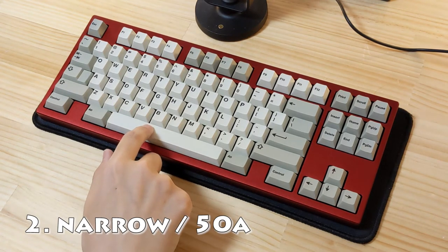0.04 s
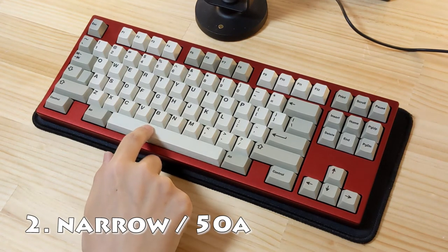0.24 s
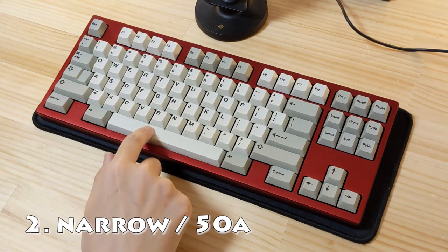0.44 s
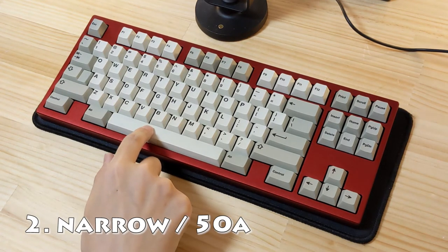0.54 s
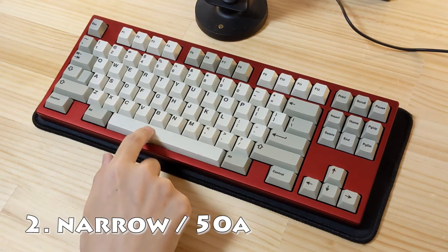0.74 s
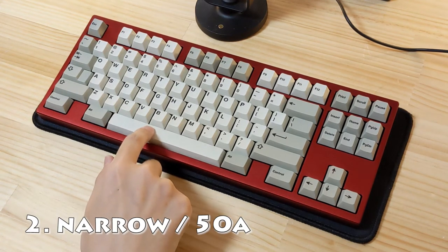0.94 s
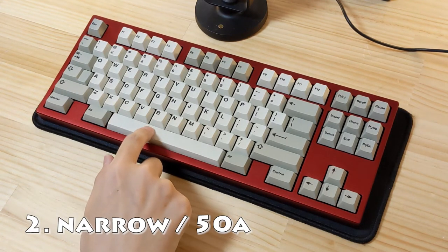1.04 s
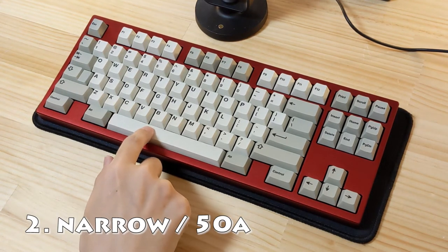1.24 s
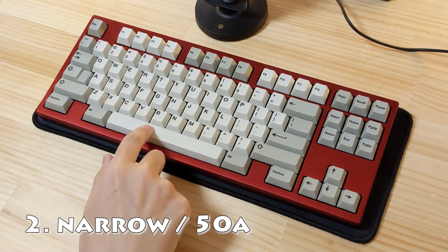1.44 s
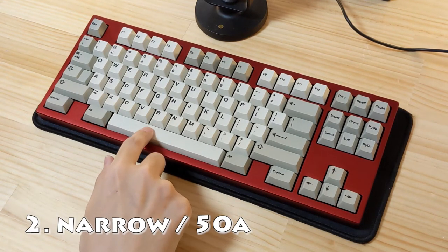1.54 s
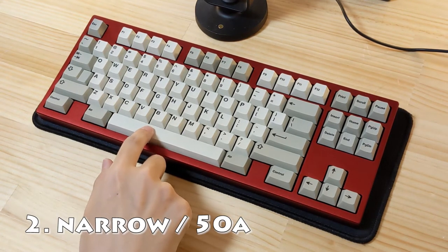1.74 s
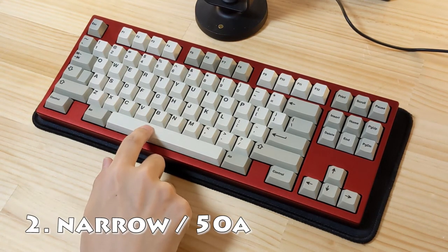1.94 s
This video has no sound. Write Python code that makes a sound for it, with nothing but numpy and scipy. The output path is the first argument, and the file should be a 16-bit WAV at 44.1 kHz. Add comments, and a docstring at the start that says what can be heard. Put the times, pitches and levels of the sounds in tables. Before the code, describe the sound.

Sharp plastic clacks come from a finger repeatedly striking a mechanical keyboard's spacebar, about seven a second, easing off near the end. Faint release ticks and a slight desk boom sit underneath, heard close up in a quiet room.

```python
"""Spacebar taps on a wooden desk

A finger taps the spacebar of a mechanical keyboard eleven times in a quiet room. Each stroke rubs down,
bottoms out with a short plastic clack and a hollow case knock, and sets the desk booming faintly.
Some strokes come back up with a soft knock and a tiny wire rattle; now and then the finger pats the cap.
Every knock is a blow on damped modes, and the same short room answers them all."""
import sys
import numpy as np
from scipy import signal
from scipy.fft import rfft, irfft
from scipy.io import wavfile
from scipy.ndimage import uniform_filter1d

SR = 44100
rng = np.random.default_rng(int(sys.argv[2]) if len(sys.argv) > 2 else 0)


def wav_out(sig):
    """Save sig, one row per channel (or a flat mono array), as 16-bit PCM at SR to the path in sys.argv[1]."""
    wavfile.write(sys.argv[1], SR, np.round(np.clip(np.atleast_2d(sig).T, -1, 1) * 32767).astype(np.int16))


N = 88200

# Colour of the room's rumble and hiss: freq_hz, density_db
ROOM_TONE_EQ = [(20, 0.5), (45, 3), (100, -5), (160, -9.5), (300, -11.5), (500, -18), (1000, -24),
                (3000, -33), (11000, -36.5), (13000, -44), (16000, -46.5)]
# Steady hum: pitch_hz, level_db
HUM_PARTIALS = [(79, -71), (135, -92.5), (215, -87), (291, -85)]
# Colour of the stem's rub: freq_hz, density_db
RUB_EQ = [(300, -31.5), (1200, -2), (2200, -2), (3800, -2), (6000, -16), (14000, -20)]
# The bar bottoms out: start_s, clack_db, tilt_db_per_octave, snap_db, case_db, boom_db
STROKES = [(.2438, -1.5, 0.5, -2, -1, -2), (0.3891, 0, 1, 0, 6.5, 2.5), (0.5361, 0, 0, 0.5, -0.5, 1.5),
           (0.6853, -3, 0, 0.5, -7.5, -2), (0.833, -1.5, 0, 1.5, 2.5, 2.5), (0.9726, -3, -0.2, 1, 0.5, -3),
           (1.1306, -2, 0.5, 0.5, 1, 0.5), (1.2753, -4.5, -0.5, -2, -5.5, -1.5),
           (1.4283, -4.5, 0, -2.5, -6.5, -4.5), (1.5893, -15, -1.7, -6, -14.5, -6.5),
           (1.716, -7, -0.9, -5.5, -11, -9.5)]
# The bar pressed down: pitch_hz, level_db, t60_s
BAR_DOWN_MODES = [(557, -42, 0.0067), (1230, -36, 0.012), (1716, -23.5, 0.007), (2217, -18, 0.0082),
                  (2711, -21, 0.0069), (3020, -27, 0.013), (4234, -28, 0.012), (5370, -37.5, 0.0066),
                  (6370, -36, 0.0047), (6762, -36.5, 0.009), (8580, -37, 0.0023), (10225, -50, 0.0081),
                  (13400, -31, 0.0018)]
# The hollow case: pitch_hz, level_db, t60_s
CASE_MODES = [(560, -1.5, 0.014), (780, 3, .018), (1130, -0.5, .014)]
# The wooden desk: pitch_hz, level_db, t60_s
DESK_MODES = [(42, -13, .4), (78.4, 5, 0.6), (102.7, -10.5, 0.37)]
# The bar comes back up: start_s, level_db
RETURNS = [(.3385, -0.5), (.7811, -4.5), (1.0797, -7.5), (1.3840, -15), (1.5333, -17.5), (1.9203, -23.5)]
# The bar at the top of its travel: pitch_hz, level_db, t60_s
BAR_UP_MODES = [(560, -2, 0.007), (1240, 1.5, .011), (2130, 4, 0.0085), (2750, 0, .008), (3314, -6, 0.029),
                (4400, -11.5, 0.026), (6480, -13.5, 0.0089), (8610, -15, .008), (13000, -15, .004)]
# The stabiliser wire rattles: start_s, level_db
RATTLES = [(.3503, -13), (.3565, 1.5), (.7942, -0.5), (1.0913, 2), (1.3875, -2.5)]
# The wire in its clips: pitch_hz, level_db, t60_s
WIRE_MODES = [(1850, -3.5, 0.0085), (3270, -1.5, 0.0064), (5200, -12.5, .005), (7100, -16.5, .006),
              (11500, -22.5, .003)]
# The finger pats the cap: start_s, level_db
TOUCHES = [(.459, -1), (1.211, 1.5), (1.561, -10), (1.665, -5)]
# The cap under the fingertip: pitch_hz, level_db, t60_s
CAP_MODES = [(666, -2.5, .03), (950, 5.5, 0.022), (1310, 2, 0.018)]
# Reflections from things on the desk: delay_s, level_db
DESK_ECHOES = [(.0022, -28), (.0098, -25)]
# Colour of the scatter round the case and desk top: freq_hz, level_db
NEAR_EQ = [(200, -8), (800, -11.5), (1300, -9), (2200, -23), (3600, -16), (4600, -18.5), (9000, -15),
           (13300, -18)]
# Decay of that scatter: freq_hz, t60_s
NEAR_DECAY = [(300, 0.047), (2000, 0.037), (12000, 0.025)]
# Colour of the room tail: freq_hz, level_db
ROOM_EQ = [(200, -7.5), (600, -12.5), (1200, -17), (2100, -17), (2900, -21), (3600, -17), (4600, -19),
           (6800, -16.5), (10000, -13.5), (13300, -21.5)]
# Decay of the room tail: freq_hz, t60_s
ROOM_DECAY = [(200, 0.22), (1000, 0.19), (2200, 0.19), (5000, 0.22), (13000, 0.22)]
# Microphone response: freq_hz, gain_db
MIC_EQ = [(20, -0.5), (13800, 0), (15000, -9), (16000, -8.5), (17000, -17)]

# Faders, on top of the levels in the tables
ROOM_TONE_DB, RUB_DB, CLACK_DB, CASE_DB, DESK_DB = -70, -74, 1, -55.5, -46.5
RETURN_DB, RATTLE_DB, TOUCH_DB = -45.5, -47.5, -69


def amp(db):
    """Decibels to gain."""
    return 10 ** (np.asarray(db) / 20)


def curve(points, hz):
    """Reads a table on a log-frequency axis."""
    f, value = np.transpose(points)
    return np.interp(np.log(hz + 1), np.log(f + 1), value)


def equalise(sound, eq):
    """Colours a sound with an EQ curve."""
    size = sound.shape[-1]
    return irfft(rfft(sound) * amp(curve(eq, np.fft.rfftfreq(size, 1 / SR))), size)


def add(mix, start_s, sound):
    """Mixes a sound in at its cue."""
    part = mix[..., max(round(start_s * SR), 0):][..., :sound.shape[-1]]
    part += sound[..., :part.shape[-1]]


def click(gain):
    """The shortest click that has this spectrum."""
    log_gain = np.log(np.r_[gain, gain[-2:0:-1]] + 1e-7)
    return np.fft.ifft(np.exp(np.conj(signal.hilbert(log_gain)))).real[:len(gain)]


def strike(modes, tilt_db=0, snap_db=0, chatter_db=-6, chatter_t60_s=0.016, size=4096):
    """A sharp blow on damped modes, then chatter as the parts settle; rows: direct, room send."""
    t, hz = np.arange(size) / SR, np.fft.rfftfreq(size, 1 / SR)
    pivot_hz, knee_hz, snap_hz, snap_octaves, blur_hz = 2170, 400, 4850, 0.45, 894
    octaves = np.log2((hz + knee_hz) / (pivot_hz + knee_hz))
    snap_band = np.exp(-(np.log2((hz + 1) / snap_hz) / snap_octaves) ** 2)
    spot_db = 0.79 * rng.standard_normal(len(modes))  # the finger never lands on quite the same spot
    ring = sum((-1) ** k * amp(db + spot_db[k] - 60 * t / t60) * np.sin(2 * np.pi * f * t)
               for k, (f, db, t60) in enumerate(modes))
    spectrum = abs(rfft(ring)) * amp(tilt_db * octaves + snap_db * snap_band)
    blurred = np.sqrt(abs(uniform_filter1d(spectrum ** 2, round(blur_hz * size / SR))))
    grains = rng.standard_normal(size) * amp(-60 * t / chatter_t60_s)
    grains *= amp(chatter_db) / np.linalg.norm(grains)
    fizz = click(blurred * amp(4.5 * octaves))  # the chatter is brighter than the blow
    chatter = signal.fftconvolve(grains, fizz)[:len(hz)]
    return np.array([click(spectrum), click(blurred)]) + chatter


def knocks(cues, modes, fader_db):
    """One light, loose strike on these modes at each cue."""
    out = np.zeros((2, N))
    for start_s, db in cues:
        add(out, start_s, amp(fader_db + db) * strike(modes))
    return out


def room_tone():
    """A faint bed of rumble, hiss and hum."""
    t = np.arange(N) / SR
    noise = equalise(rng.standard_normal(N), ROOM_TONE_EQ)
    hum = sum(amp(db) * np.sqrt(2) * np.sin(2 * np.pi * (hz * t + rng.random()))
              for hz, db in HUM_PARTIALS)
    return amp(ROOM_TONE_DB) * noise / noise.std() + hum


def stem_rub(travel_s=0.023):
    """The stem rubs in its housing, swelling as the bar speeds down."""
    out = np.zeros(N)
    swell = np.sqrt(np.linspace(0, 1, round(travel_s * SR)))
    for start_s, *_ in STROKES:
        rub = equalise(rng.standard_normal(8192), RUB_EQ)
        add(out, start_s - travel_s, amp(RUB_DB) * rub[:len(swell)] / rub.std() * swell)
    return out


def bar_clack():
    """The plastic bar bottoms out: a hard, tight hit with little chatter."""
    out = np.zeros((2, N))
    for start_s, db, tilt_db, snap_db, *_ in STROKES:
        clack = strike(BAR_DOWN_MODES, tilt_db, snap_db, chatter_db=-15, chatter_t60_s=0.011)
        add(out, start_s, amp(CLACK_DB + db) * clack)
    return out


def case_knock(delay_s=0.006096):
    """The case knocks hollowly just after the bar lands."""
    cues = [(start_s + delay_s, case_db) for start_s, *_, case_db, _ in STROKES]
    return knocks(cues, CASE_MODES, CASE_DB)


def desk_boom(delay_s=0.02675, rise_s=0.014):
    """The desk's low modes swell just after each stroke and ring into the next."""
    t, out = np.arange(SR) / SR, np.zeros(N)
    ring = sum(amp(db - 60 * t / t60) * np.sin(2 * np.pi * hz * t) for hz, db, t60 in DESK_MODES)
    boom = ring * np.minimum(t / rise_s, 1)
    for start_s, *_, boom_db in STROKES:
        add(out, start_s + delay_s, amp(DESK_DB + boom_db) * boom)
    return out


def bar_return():
    """The rising bar knocks softly at the top of its travel."""
    return knocks(RETURNS, BAR_UP_MODES, RETURN_DB)


def wire_rattle():
    """The stabiliser wire ticks in its clips."""
    return knocks(RATTLES, WIRE_MODES, RATTLE_DB)


def finger_touch():
    """The fingertip lands on the cap with a dull pat."""
    return knocks(TOUCHES, CAP_MODES, TOUCH_DB)


def tail(level_db, t60_s, delay_s, size=256):
    """A dense train of reflections; level and decay are functions of frequency."""
    hz, t, bands = signal.stft(rng.choice([-1., 1.], SR // 2), SR, nperseg=size)
    decay_s = t60_s(hz)[:, None]
    unit_energy = np.sqrt(2 * np.log(1000) / (decay_s * SR))
    bands = bands * amp(level_db(hz)[:, None] - 60 * t / decay_s) * unit_energy
    out = np.zeros(N)
    add(out, delay_s, signal.istft(bands, SR, nperseg=size)[1])
    return out


def room_reverb(send, late_hz=2250, late_width_hz=400):
    """Near scatter, a short room tail, a late cluster round the clack's main pitch, and desk echoes."""
    response = tail(lambda hz: curve(NEAR_EQ, hz), lambda hz: curve(NEAR_DECAY, hz), delay_s=0.003)
    response += tail(lambda hz: curve(ROOM_EQ, hz), lambda hz: curve(ROOM_DECAY, hz), delay_s=0.0064)
    response += tail(lambda hz: -20.5 - 20 * np.log10(1 + (2 * (hz - late_hz) / late_width_hz) ** 2),
                     t60_s=lambda hz: np.full(len(hz), 0.15), delay_s=0.036)
    for delay_s, db in DESK_ECHOES:
        add(response, delay_s, amp([db]))
    return signal.fftconvolve(send, response)[:N]


def scene():
    """The mono mix: the keyboard and its reverb over dry desk boom and room tone."""
    keyboard = bar_clack() + case_knock() + bar_return() + wire_rattle() + finger_touch()
    direct, send = keyboard + stem_rub()
    return (direct + room_reverb(send) + desk_boom() + room_tone())[None]


def record(dry, cutoff_hz=16800):
    """The microphone rolls off the top end, then a steep low-pass closes it."""
    low_pass = signal.firwin(255, cutoff_hz, window=("kaiser", 9), fs=SR)
    return signal.oaconvolve(equalise(dry, MIC_EQ), low_pass[None], "same")


dry = scene()
out = record(dry)
wav_out(out)
```